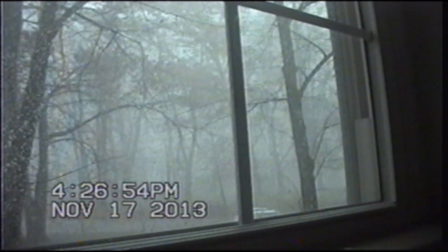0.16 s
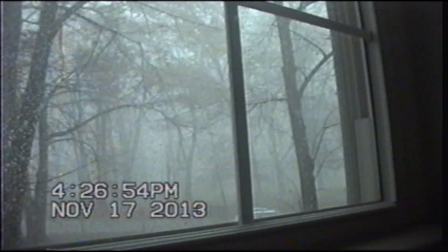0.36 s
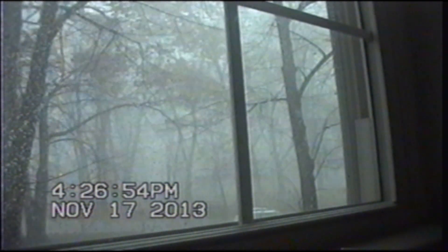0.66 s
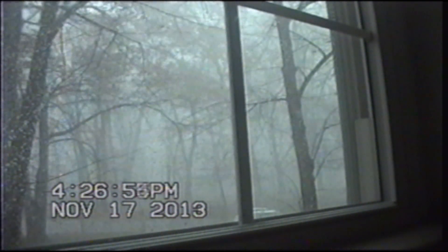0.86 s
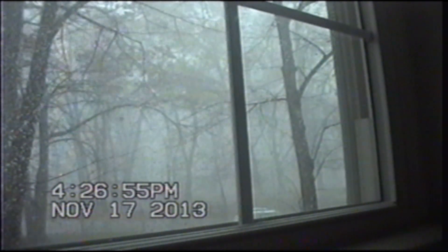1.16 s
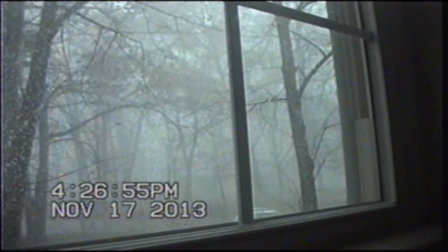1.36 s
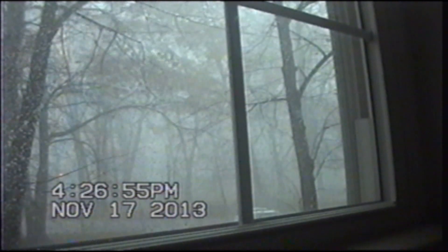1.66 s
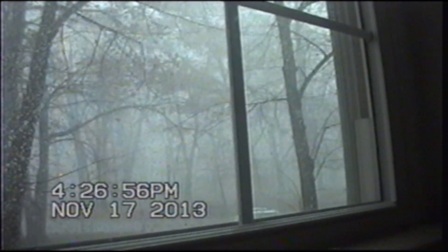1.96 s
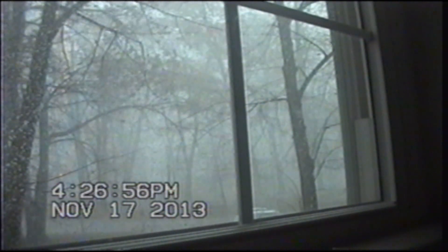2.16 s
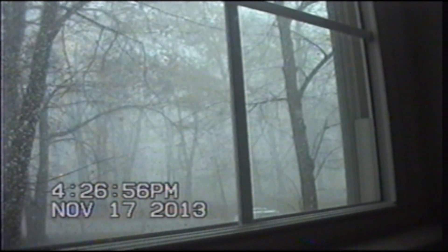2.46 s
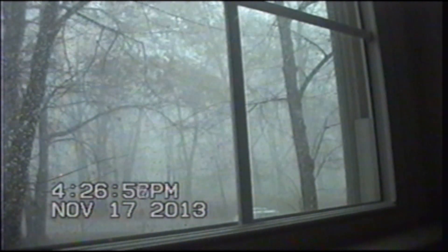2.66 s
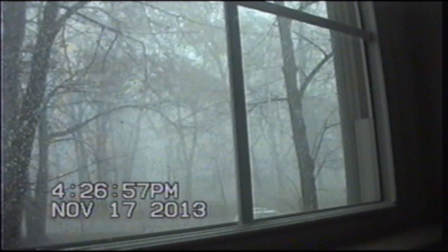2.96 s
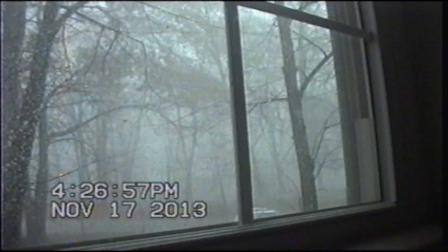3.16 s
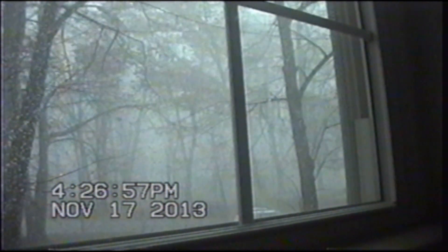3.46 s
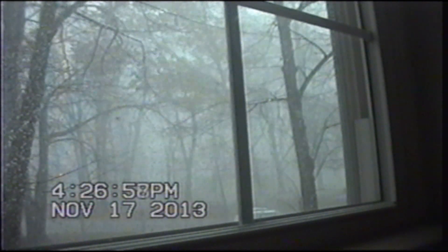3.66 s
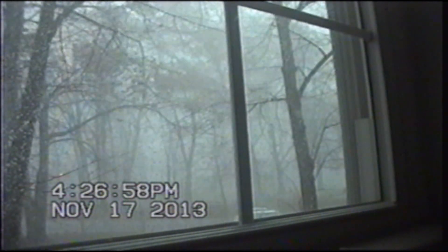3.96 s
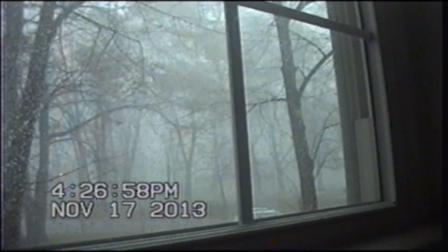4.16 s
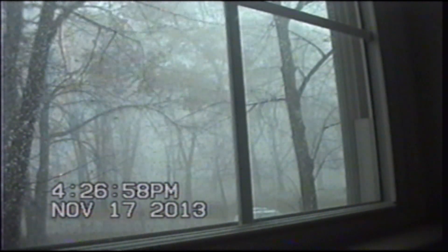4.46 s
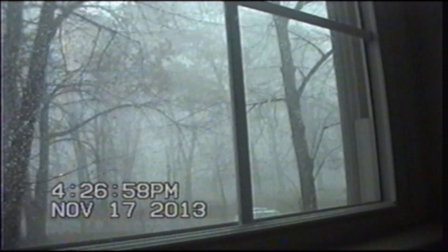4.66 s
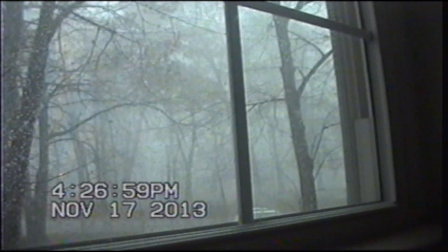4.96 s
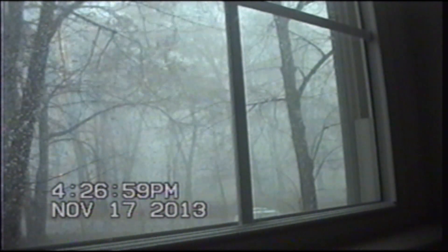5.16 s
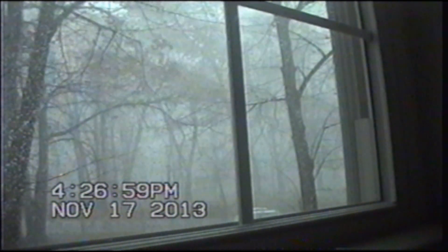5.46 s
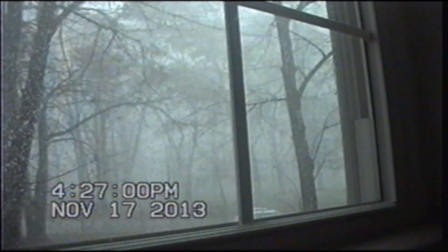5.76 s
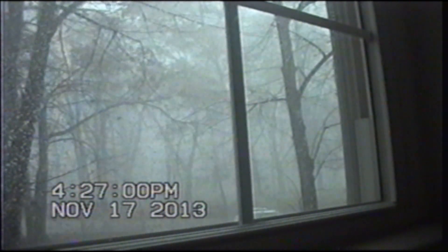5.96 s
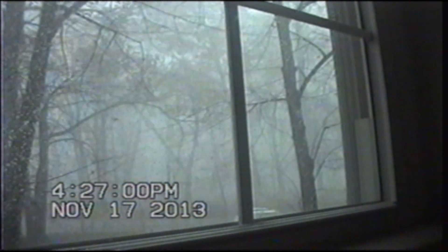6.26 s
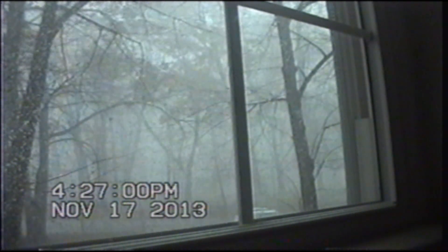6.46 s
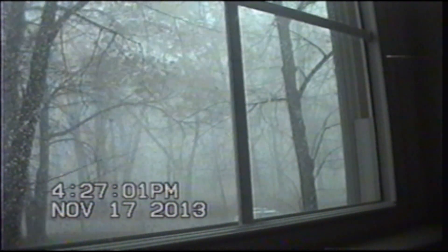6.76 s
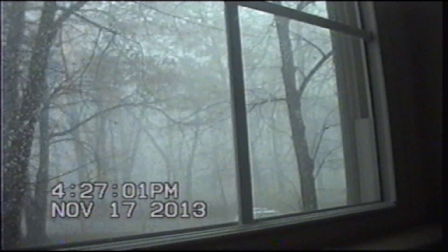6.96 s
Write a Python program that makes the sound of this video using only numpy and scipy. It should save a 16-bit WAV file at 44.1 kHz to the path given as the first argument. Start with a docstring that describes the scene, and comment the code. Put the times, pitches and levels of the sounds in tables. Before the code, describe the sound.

Strong storm wind rushes and howls behind a closed window, with low buffeting, faint rain hiss and a faint motor whine.

```python
"""Storm behind a closed window

Turbulent gusts drive the resonances of the room, the panes and the frame, and a cavity of the window
howls near 300 Hz. Trees roar outside, and the impacts of driven rain hiss on the glass.
A camera's tape motor whines faintly. The sound lies almost wholly in the left channel."""
import sys
import numpy as np
from scipy import signal
from scipy.fft import rfft, irfft
from scipy.io import wavfile
from scipy.ndimage import uniform_filter1d

SR = 44100
rng = np.random.default_rng(int(sys.argv[2]) if len(sys.argv) > 2 else 0)


def log_audio(samples):
    """Write samples as a 16-bit WAV file to the path given in sys.argv[1]."""
    # one column per channel
    frames = np.atleast_2d(samples).T
    # limit to full scale, then quantise
    limited = np.clip(frames, -1, 1)
    pcm = np.round(limited * 32767).astype(np.int16)
    wavfile.write(sys.argv[1], SR, pcm)


N = 313992

# weaker partials of the motor: (frequency [Hz], relative level [dB])
MOTOR_PARTIALS = [(1079, -63), (1440, -68), (1685, -66.5), (2040, -70), (2075, -66.5), (2335, -73.5),
                  (2465, -70), (2594, -70), (2724, -69.5), (2880, -73.5), (3650, -73.5)]
# throbs of its strongest partial: (time [s], duration [s], level [dB])
MOTOR_THROBS = [(0.44, 0.42, -65), (0.98, 0.4, -62), (1.6, 0.3, -63.5), (2.13, 0.2, -64), (2.83, 0.4, -63),
                (3.42, 0.25, -67), (4.0, 0.3, -66), (6.3, 0.22, -65.5), (6.76, 0.31, -64.5)]
# rain on glass and leaves: (frequency [Hz], relative spectral density [dB])
RAIN_SPECTRUM = [(800, -4.5), (1800, 2.5), (2600, 2), (3200, 0.3), (3800, 3), (4600, 1.3), (5500, 1),
                 (6400, -3.5), (8000, -7), (10500, -12.5)]
# heaviness of the rain: (time [s], level [dB])
RAIN_LEVEL = [(0, -55), (0.5, -54.5), (0.9, -54.5), (1.18, -54.5), (1.55, -55.5), (2.05, -55),
              (2.62, -55.5), (3.4, -55.5), (4.2, -53.8), (4.45, -55), (4.7, -54.5), (4.95, -54.5),
              (5.2, -54.5), (5.8, -54.9), (6.4, -54.5), (6.68, -55), (7.1, -54)]
# force of the wind, building to one long gust: (time [s], relative level [dB])
WIND_FORCE = [(0, -0.9), (0.75, -1), (1.45, -0.9), (2.1, -1.1), (2.75, -1), (3.5, 0.1), (4.2, 1),
              (5.0, 1.4), (5.55, 1.8), (5.92, 0.7), (6.25, 0.3), (6.8, -0.5), (7.1, -0.5)]
# rush of air behind the glass: (frequency [Hz], relative spectral density [dB])
RUSH_SPECTRUM = [(20, -9.5), (45, -4), (130, -2), (450, 10.5), (700, 1.5), (940, -1.5), (1100, 0.5),
                 (1400, -6), (1650, -8), (1850, -7.5), (2300, -13), (3200, -19.5), (6000, -46)]
# resonances that transmit the trees' roar: (frequency [Hz], bandwidth [Hz], relative level [dB])
ROAR_MODES = [(538.4, 49, -7.5), (607.3, 48, -8.5), (675, 93, -8.5), (788, 64, -16), (889, 44, -20)]
# deep resonances of the room: (frequency [Hz], bandwidth [Hz], relative level [dB])
ROOM_MODES = [(52.3, 14, -14.5), (79.5, 9, -17.5), (95, 25, 3)]
# pressure surges in the room: (time [s], gain [dB])
ROOM_SURGES = [(0.03, 1), (0.28, 4), (1.5, 8), (2.6, 2), (3.76, 2), (5.25, 6.5), (5.52, 8), (6.58, 8)]
# resonances of the panes: (frequency [Hz], bandwidth [Hz], relative level [dB])
PANE_MODES = [(137.6, 34, -6.5), (155.95, 11.6, -3.5), (191.1, 41.7, -0.5), (211.3, 17.8, -0.5),
              (235.7, 21, -2), (256, 46, -1)]
# buffets on the panes: (time [s], gain [dB])
PANE_BUFFETS = [(0.58, 3.5), (1.06, 6), (1.89, 4.5), (2.37, 3), (3.42, 2.5), (3.76, 3.2), (3.97, 3),
                (4.09, 5.5), (4.32, 3.5), (4.66, 6), (5.0, 4), (5.51, 5.5), (6.0, 3.5), (6.34, 4),
                (6.46, 5), (6.86, 3.5)]
# resonances of the frame: (frequency [Hz], bandwidth [Hz], relative level [dB])
FRAME_MODES = [(346, 52, -6), (379.6, 36, -1.6), (403, 23.6, -4), (447.2, 32.5, -5.5), (475.4, 33, -9)]
# waves of wind on the frame: (time [s], gain [dB])
FRAME_WAVES = [(0.24, 2.5), (0.73, 3), (2.92, 3), (3.78, -1), (4.04, 1.8), (4.54, 3.5), (5.03, 3), (5.3, 1),
               (5.54, 3), (5.94, 2.5), (6.29, 2.2), (6.87, 2)]
# resonances of the window cavity: (frequency [Hz], bandwidth [Hz], relative level [dB])
CAVITY_MODES = [(291.4, 20.6, -1), (303.9, 18.8, -5.5), (319.3, 15.6, -4)]
# lulls of the howl: (time [s], duration [s], gain [dB])
HOWL_LULLS = [(0.598, 0.059, -5), (1.1, 0.06, -7), (1.655, 0.033, -10), (2.664, 0.19, -3),
              (2.96, 0.091, -3.5), (3.42, 0.056, -6), (4.536, 0.037, -3.5), (5.133, 0.1, -3.5),
              (5.78, 0.045, -8.5), (6.114, 0.068, -4), (6.945, 0.16, -2.5)]
# flares of the howl into a hoot: (time [s], duration [s], gain [dB], frequency [Hz])
HOWL_FLARES = [(0.177, 0.1, 7.5, 301), (0.504, 0.09, 2.5, 296.7), (0.7, 0.093, 2.5, 296),
               (1.224, 0.036, 2.5, 292.8), (1.316, 0.03, 2.5, 314), (1.492, 0.05, 5.5, 301),
               (1.6, 0.082, 8, 295.5), (1.746, 0.066, 6, 299.6), (1.857, 0.05, 1, 295),
               (2.018, 0.03, 4, 301), (2.536, 0.049, 4, 302.4), (3.6, 0.14, 2.5, 297.7),
               (3.865, 0.039, 3.5, 310), (4.017, 0.081, 2.5, 314), (4.222, 0.04, 5.5, 299),
               (4.663, 0.15, 3.5, 312), (4.987, 0.046, 2.5, 307.6), (5.266, 0.13, 4, 298),
               (5.632, 0.22, 4, 297), (5.853, 0.053, 2, 299), (6.046, 0.062, 0.5, 302),
               (6.356, 0.023, 1.5, 312), (6.519, 0.1, 3.5, 301.4), (6.767, 0.05, 3, 294)]


def from_db(db):
    """Amplitude ratio of a level: tenfold for every 20 dB."""
    return 10 ** (np.asarray(db) / 20)


def unit_rms(x):
    """Normalisation to unit mean power."""
    return x / np.sqrt(np.mean(x ** 2) + 1e-20)


def contour(points):
    """Linear interpolation of (time, value) points at every sample."""
    return np.interp(np.arange(N) / SR, *np.transpose(points))


def swell(crest_s, length_s):
    """A raised-cosine pulse of height 1, length_s wide at half height."""
    offset = np.clip((np.arange(N) / SR - crest_s) / length_s, -1, 1)
    return np.cos(np.pi / 2 * offset) ** 2


def drift(cutoff_hz):
    """Slow random fluctuation of rms 1: noise through a two-pole low-pass."""
    hop, settling = 40, 2000
    pole = np.exp(-2 * np.pi * hop * cutoff_hz / SR)
    noise = rng.standard_normal(N // hop + settling + 2)
    slow = signal.lfilter([1], [1, -2 * pole, pole * pole], noise)[settling:]
    return np.interp(np.arange(N) / hop, np.arange(len(slow)), unit_rms(slow))


def coloured(x, spectrum):
    """Linear filtering by a smooth spectral envelope; rms 1."""
    hz, db = np.transpose(spectrum)
    bins_hz = np.maximum(np.fft.rfftfreq(N, 1 / SR), 1)
    gain = from_db(np.interp(np.log(bins_hz), np.log(hz), db))
    return unit_rms(irfft(rfft(x) * gain, N))


def resonate(modes):
    """Forced vibration: turbulence drives each mode, filtered twice for steep skirts; rms 1."""
    response = np.zeros(N)
    for hz, width_hz, db in modes:
        radius = np.exp(-np.pi * width_hz / SR)
        section = [1 - radius, 0, radius - 1, 1, -2 * radius * np.cos(2 * np.pi * hz / SR), radius ** 2]
        ringing = signal.sosfilt([section, section], rng.standard_normal(N + SR // 2))[-N:]
        response += from_db(db) * unit_rms(ringing)
    return unit_rms(response)


def at_level(x, level_db, average_s):
    """The running rms is made to follow level_db; flutter faster than average_s remains."""
    size = max(int(average_s * SR), 2)
    power = uniform_filter1d(uniform_filter1d(x * x, size), size)
    return from_db(level_db) * x / np.sqrt(power + 1e-9)


def tape_motor(partials_gain_db=-7.5, throb_hz=1815.0, floor_db=-75, wow=0.00105):
    """Frequency modulation: the motor's wow bends all partials alike, while each wavers in level."""
    running_s = np.cumsum(1 + wow * drift(5.1)) / SR
    tones = [(hz, partials_gain_db + db + 2.5 * drift(2.5)) for hz, db in MOTOR_PARTIALS]
    throb = sum(from_db(db) * swell(s, length_s) for s, length_s, db in MOTOR_THROBS)
    throb_db = 20 * np.log10(np.maximum(throb, from_db(floor_db)))
    tones.append((throb_hz, throb_db - drift(4.4)))
    whine = sum(from_db(db) * np.sin(2 * np.pi * (hz * running_s + rng.random())) for hz, db in tones)
    return np.sqrt(2) * whine


def rain(drops_per_s=2500, size_spread_db=4.0, drops_db=-10, flicker_db=0.3):
    """Shot noise: drops strike the glass at random, more often in heavy rain, over a hiss of spray."""
    rain_db = contour(RAIN_LEVEL)
    impacts = rng.random(N) < drops_per_s * from_db(rain_db - rain_db.mean()) / SR
    sizes = from_db(size_spread_db * np.minimum(rng.exponential(1, N), 5)) * rng.choice([-1, 1], N)
    water = rng.standard_normal(N) + from_db(drops_db) * unit_rms(impacts * sizes)
    return from_db(rain_db + flicker_db * drift(14)) * coloured(water, RAIN_SPECTRUM)


def trees(wind_db):
    """Transmission loss: the window muffles the trees' roar and the rush of air, which share eddies."""
    eddies = drift(4.5)
    roar_db = -43 + 0.98 * wind_db + 0.73 * eddies
    rush_db = -44.5 + 0.9 * wind_db + 0.48 * eddies
    roar = at_level(resonate(ROAR_MODES), roar_db, average_s=0.17)
    rush = from_db(rush_db) * coloured(rng.standard_normal(N), RUSH_SPECTRUM)
    return roar + rush


def room(surge_s=0.11, eddies_db=2.0):
    """Standing waves: the room's low modes rumble and swell with each surge of pressure."""
    surges_db = sum(db * swell(s, surge_s) for s, db in ROOM_SURGES)
    room_db = -49.5 + surges_db + eddies_db * drift(5.0)
    return at_level(resonate(ROOM_MODES), room_db, average_s=0.35)


def window(wind_db, buffet_s=0.053, wave_s=0.11, eddies_db=0.35):
    """Forced vibration: wind pressure thumps the panes in buffets and loads the frame in waves."""
    buffets_db = sum(db * swell(s, buffet_s) for s, db in PANE_BUFFETS)
    waves_db = sum(db * swell(s, wave_s) for s, db in FRAME_WAVES)
    panes_db = -34.5 + 0.15 * wind_db + buffets_db + eddies_db * drift(5.5)
    frame_db = -37.5 + 0.78 * wind_db + waves_db
    panes = at_level(resonate(PANE_MODES), panes_db, average_s=0.11)
    frame = at_level(resonate(FRAME_MODES), frame_db, average_s=0.13)
    return panes + frame


def cavity_howl(wind_db, hoot_rms=1.06, eddies_db=0.1):
    """Cavity resonance: a breathy howl falters in lulls and flares into a louder, purer hoot."""
    t = np.arange(N) / SR
    air = resonate(CAVITY_MODES)
    lulls_db = sum(db * swell(s, length_s) for s, length_s, db in HOWL_LULLS)
    howl_db = -31 + 0.51 * wind_db + lulls_db - eddies_db * drift(4.9)
    for s, length_s, db, hz in HOWL_FLARES:
        flare = swell(s, length_s)
        hoot = np.sqrt(2) * np.sin(2 * np.pi * (hz * t + rng.random()))
        air += hoot_rms * flare * hoot   # relative to the breathy howl
        howl_db += db * flare
    return at_level(air, howl_db, average_s=0.052)


def scene(left_db=6.0, right_db=-60.0):
    """Superposition: all sources add at one microphone, which feeds the left and barely the right."""
    wind_db = contour(WIND_FORCE)
    storm = room() + window(wind_db) + cavity_howl(wind_db) + trees(wind_db) + rain()
    microphone = storm + tape_motor()
    return np.array([from_db(left_db) * microphone, from_db(right_db) * microphone])


def record(dry, hiss_db=-85.0, cutoff_hz=10500):
    """Noise floor and band limit: the electronics add faint hiss and cut the treble steeply."""
    # (frequency [Hz], relative spectral density [dB])
    spectrum = [(30, -5.5), (130, -10.0), (1000, -17.5), (4000, -22.0), (10000, -25.5)]
    hiss = from_db(hiss_db) * np.array([coloured(x, spectrum) for x in rng.standard_normal((2, N))])
    low_pass = signal.ellip(14, .1, 70, cutoff_hz, fs=SR, output="sos")
    return signal.sosfilt(low_pass, dry + hiss)


dry = scene()
out = record(dry)
log_audio(out)
```